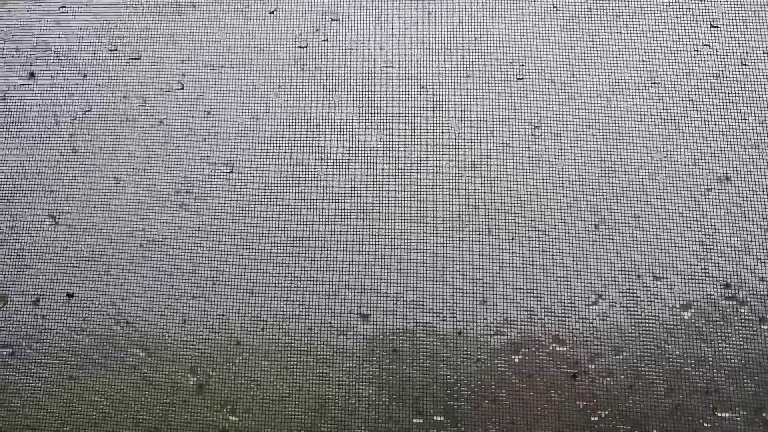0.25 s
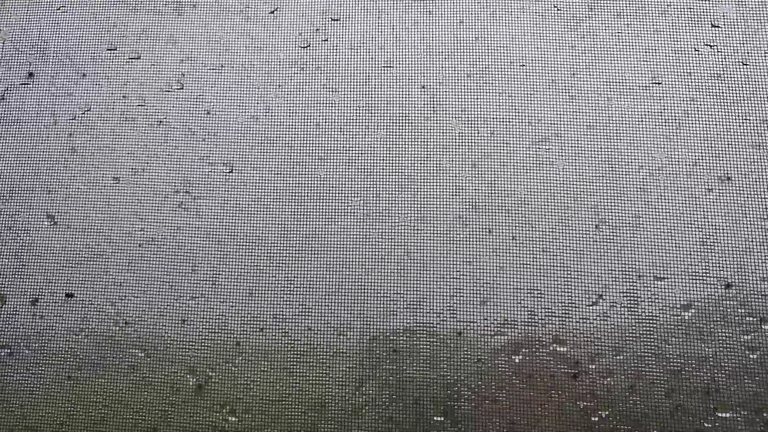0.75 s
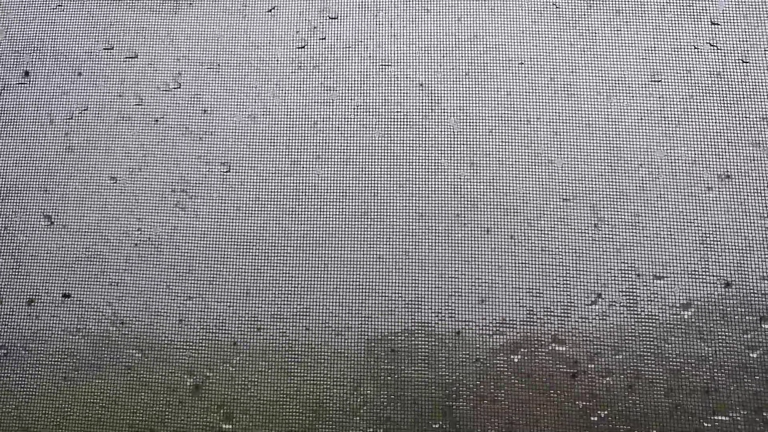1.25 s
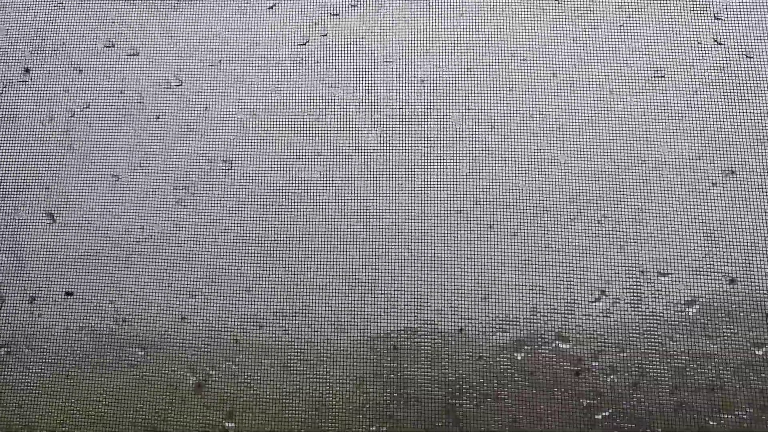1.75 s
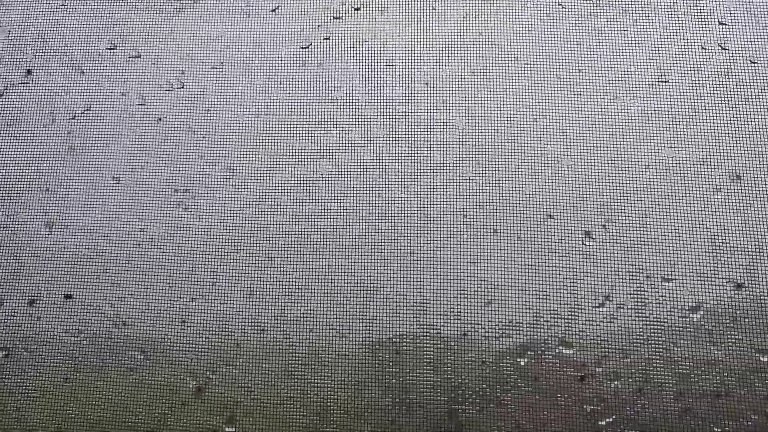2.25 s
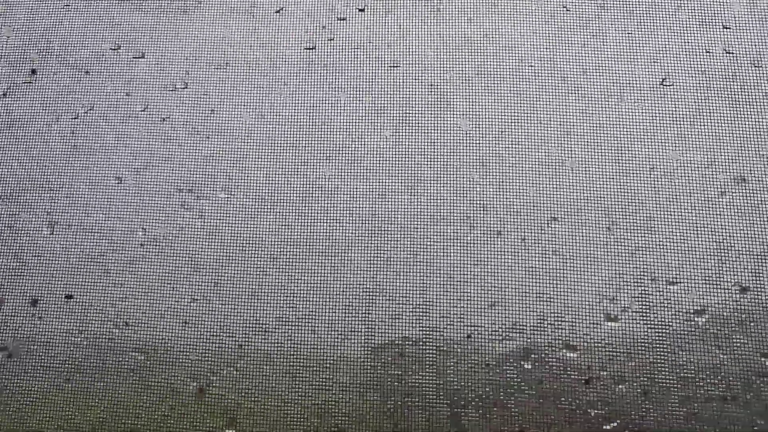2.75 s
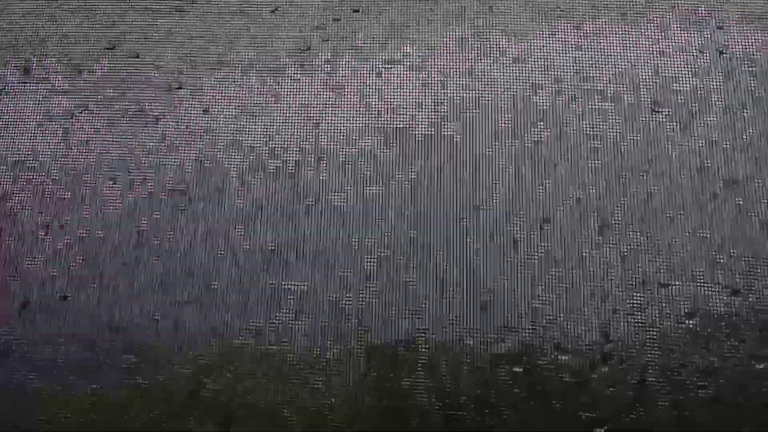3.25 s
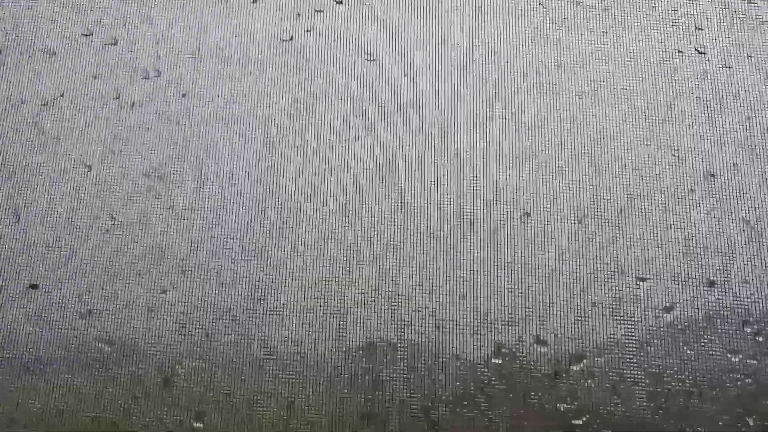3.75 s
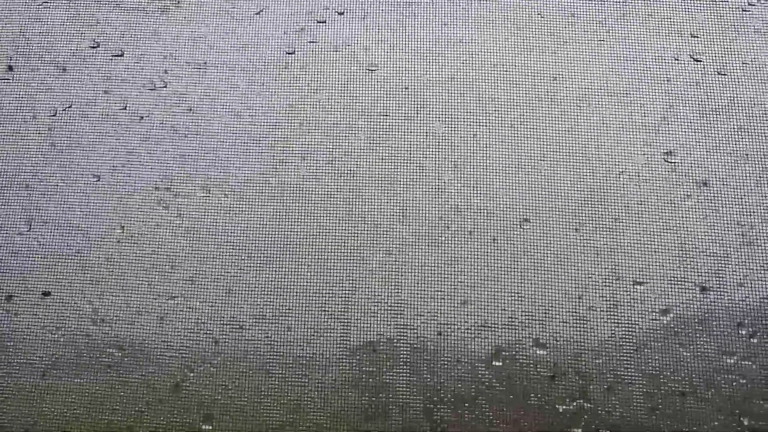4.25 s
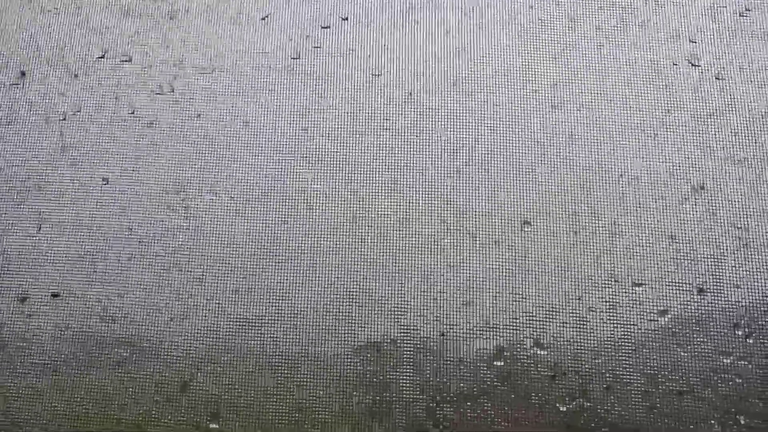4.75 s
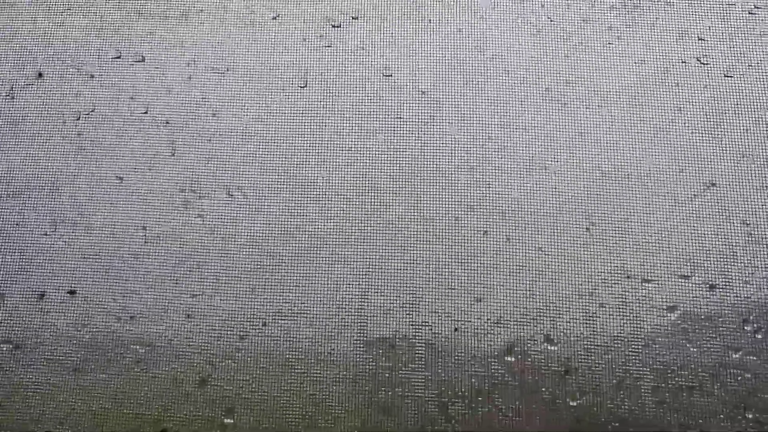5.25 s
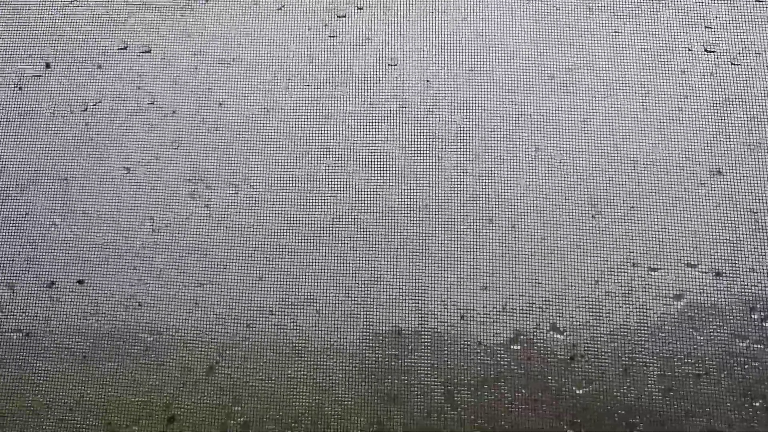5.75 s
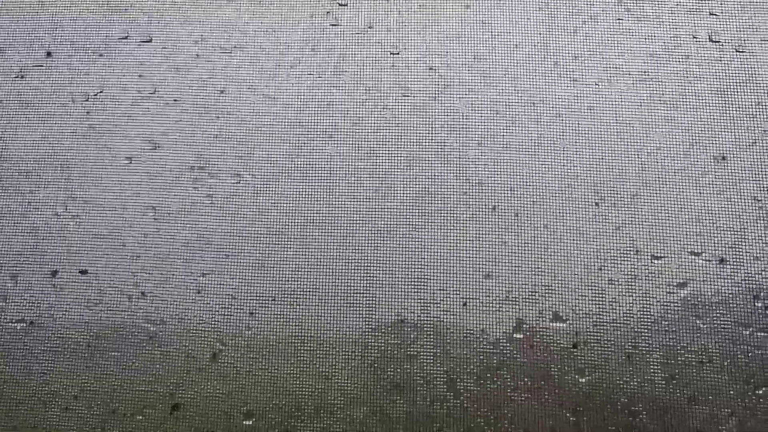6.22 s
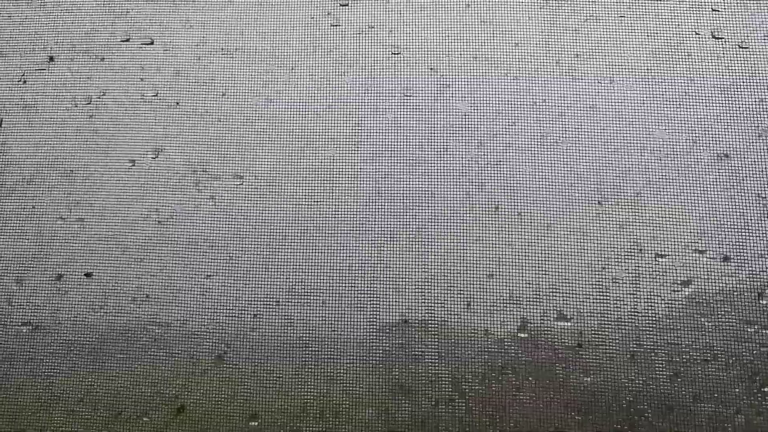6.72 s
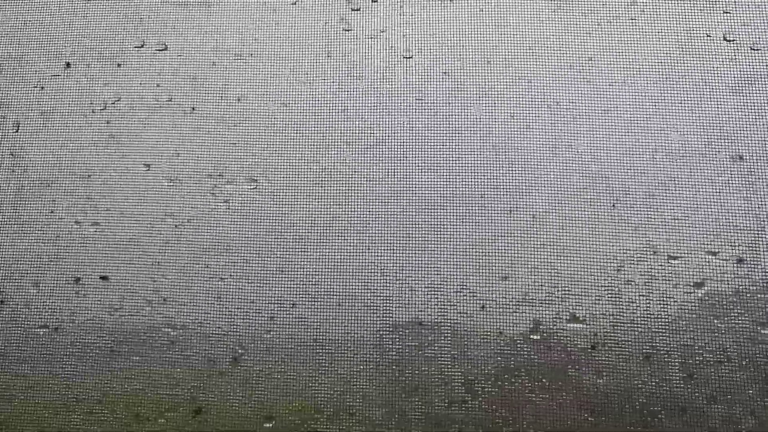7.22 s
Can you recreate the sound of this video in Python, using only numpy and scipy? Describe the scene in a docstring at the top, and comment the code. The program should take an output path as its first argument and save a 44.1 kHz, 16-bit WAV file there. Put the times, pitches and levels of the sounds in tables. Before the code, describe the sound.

Soft rain for two and a half seconds, then a tearing thunderclap, a sharper second crack, and deep peals rolling on to the end.

```python
"""Close thunder: shock waves from a crooked lightning channel arrive as claps and peals, near bends crackling,
far bends booming and thudding. Claps are shocks and noise bursts, peals swelling bands of noise. A hollow ring
and a thin rattle follow the second strike; short pitched rings and ticks sit among the claps. Behind it rain
patter (random impacts), louder around 3 s with the thunder's own hiss mixed in, single drops (rising sines) and
a faint narrow hiss high above 11 kHz. An open window with a wet screen colours claps, peals and rain."""
import sys
import numpy as np
from scipy import signal
from scipy.fft import rfft, irfft, next_fast_len
from scipy.io import wavfile
from scipy.ndimage import uniform_filter1d, minimum_filter1d, map_coordinates

SR = 44100
rng = np.random.default_rng(int(sys.argv[2]) if len(sys.argv) > 2 else 0)


def digitize_waveform(pressure):
    """Quantize a signal to 16-bit integers and store it at the path in sys.argv[1].

    Rows of a 2-D input are taken as channels; values are limited to [-1, 1].
    """
    field = np.atleast_2d(pressure).T
    bounded = np.clip(field, -1, 1)
    quanta = np.round(bounded * 32767).astype(np.int16)
    wavfile.write(sys.argv[1], SR, quanta)


N = 329779

# Single shock fronts. Each row: start in seconds, clap level in dB, sizzle in dB, low push in dB,
# crackle after it in dB, decay of the tearing burst by 60 dB in seconds.
CLAPS = [(2.589, -29.5, -53, -54, -40.5, 0.11), (2.708, -23, -46, -43, -32.5, 0.087),
         (2.722, -36, -39, -47, -27, 0.073), (2.734, -26.5, -43, -48, -32.5, 0.087),
         (2.767, -29, -45, -44, -42, 0.11), (2.813, -13.5, -53.5, -33, -34.5, 0.044),
         (2.898, -32, -42, -41, -38, 0.088), (2.916, -27, -45, -33, -39, 0.08),
         (2.952, -30, -39, -21, -36, 0.08), (2.974, -15.5, -38.5, -24, -34, 0.05),
         (2.988, -15.5, -39.5, -27, -39, .04), (3.032, -18, -41, -31, -38, 0.05),
         (3.068, -20, -56, -36, -40, 0.045), (3.109, -25, -61, -31.5, -35, 0.067),
         (3.143, -20, -47.5, -50, -48, 0.05), (3.246, -19, -46.5, -55, -39, 0.086),
         (3.262, -26, -54, -55, -34, 0.09), (3.519, -26, -55, -50, -40, 0.07),
         (3.806, -25, -52, -53, -38, 0.098), (3.83, -28, -64, -55, -41, 0.2),
         (4.186, -30, -51, -41, -36, 0.13), (4.335, -8, -36, -20, -36, 0.049),
         (4.347, -15, -37.5, -30, -33, 0.052), (4.384, -20.5, -56.5, -17, -34, 0.039),
         (4.478, -12.5, -40, -28, -44, 0.04), (4.488, -17.5, -45.5, -35, -37, .04),
         (4.545, -18, -43, -39, -37, 0.045), (4.555, -10, -37, -30, -35, 0.049),
         (4.577, -16, -51, -36, -38, 0.055), (4.643, -28, -53.5, -27, -31.5, 0.044),
         (4.739, -27, -52, -35, -45, 0.057), (4.788, -25.5, -51, -36, -37, 0.11),
         (4.857, -22, -53, -35, -36, 0.044), (4.877, -19, -53, -29, -45, 0.063),
         (4.901, -25.5, -56, -22, -51, 0.039), (4.96, -22, -46.5, -33, -33, 0.055),
         (5.074, -19, -52.5, -35, -40, 0.06), (5.092, -16.5, -54, -26, -40, 0.052),
         (5.275, -34, -61, -42, -43, 0.046), (5.363, -22.5, -55, -46, -36, 0.042),
         (5.397, -39, -62, -39, -54, 0.05), (5.434, -20.5, -61, -44, -46, 0.06),
         (5.595, -29, -59, -33, -41, 0.069), (6.076, -37, -65, -44, -41, 0.05),
         (6.312, -35, -68, -40, -39, .053), (6.562, -31.5, -54.5, -39, -45, 0.11),
         (6.603, -28, -71, -22.5, -38, 0.092), (7.073, -42, -71, -44, -48.5, .085),
         (7.101, -39, -64.5, -28, -44.5, 0.087), (7.23, -31, -66.5, -17, -44, 0.042)]
# Pitched rings in the claps. Each row: start in seconds, mean pitch in Hz, level in dB, hold in seconds,
# decay by 60 dB in seconds.
PINGS = [(2.728, 615, -31, 0.015, 0.053), (2.73, 1990, -36, 0.007, .05), (2.897, 869, -31, 0.02, .05),
         (2.967, 237.7, -14.5, 0.021, 0.091), (3.141, 640, -23, 0.0055, 0.03),
         (3.248, 1895, -34, .015, .06), (4.334, 405, -17, 0.0044, 0.028), (4.338, 1913, -25, 0.0062, 0.038),
         (4.339, 913, -19, 0.0094, .04), (4.382, 1250, -29, 0.0065, .04), (4.4786, 894, -19, 0.0061, 0.037),
         (4.486, 555, -20.5, .008, .04), (4.483, 1610, -31.5, 0.026, 0.062),
         (4.552, 885, -22.5, 0.01, 0.036), (4.556, 2120, -25, 0.0042, .04), (4.735, 613, -25, .008, 0.062),
         (4.79, 1160, -31.5, 0.015, 0.078), (4.96, 627, -24, .008, .06), (4.961, 1930, -41, .01, 0.044),
         (4.985, 1530, -35, 0.017, 0.069), (5.079, 644, -24, 0.0069, 0.066),
         (5.433, 623, -27.5, 0.0049, .05), (6.317, 726, -36, 0.016, .05), (7.225, 209, -9.5, 0.0087, 0.064)]
# Peals from bends of the channel. Each row: time of the peak in seconds, thud in dB, boom in dB,
# growl in dB, time of the last 20 dB of rise in seconds.
PEALS = [(2.616, -40.5, -48, -44, 0.045), (2.736, -37, -27.5, -31.5, 0.059), (2.815, -44, -29, -28, 0.055),
         (2.919, -48, -30.5, -30, 0.062), (2.978, -31.5, -24.5, -32, 0.051), (2.993, -34, -23, -34, 0.06),
         (3.021, -40, -20.5, -29.5, 0.15), (3.079, -33.5, -25.5, -30.5, 0.071), (3.17, -53, -31, -34, 0.08),
         (3.319, -51, -32, -34.5, 0.3), (3.443, -46, -51, -61, 0.15), (3.559, -59, -38.5, -53, 0.14),
         (3.609, -44, -53, -55, 0.071), (3.697, -60, -41.5, -41, 0.12), (3.83, -43, -44, -46, 0.074),
         (3.95, -47, -42, -42, 0.22), (4.037, -37.5, -48, -56, 0.18), (4.197, -50, -47, -40, 0.031),
         (4.34, -23, -23, -20, 0.0053), (4.36, -22, -18, -23.5, 0.015), (4.388, -31, -22, -22.5, .01),
         (4.433, -37, -38, -23, 0.03), (4.457, -25.5, -25.5, -43, 0.012),
         (4.484, -20.5, -21.5, -24.5, 0.012), (4.516, -18.5, -20, -38, 0.03),
         (4.563, -26.5, -21, -24, 0.069), (4.646, -26, -27, -45, 0.049), (4.72, -35, -33.5, -34.5, .08),
         (4.79, -30, -40, -28.5, 0.074), (4.896, -30, -21.5, -29, .06), (4.959, -21.5, -27, -35, .04),
         (4.992, -21, -24.5, -25, 0.071), (5.024, -37, -33, -30, .04), (5.079, -27.5, -27, -23.5, 0.026),
         (5.106, -35, -25.5, -41, .04), (5.144, -28, -38, -31.5, 0.079), (5.199, -31.5, -44, -27, 0.14),
         (5.32, -38, -32, -50, 0.19), (5.452, -37, -38, -31, 0.26), (5.61, -42, -47, -32, 0.15),
         (5.766, -47, -47, -34, 0.085), (5.84, -36.5, -53, -36.5, 0.067), (5.97, -40, -38, -57, 0.037),
         (6.06, -41, -40, -41, 0.056), (6.12, -38, -44, -38, .04), (6.25, -41, -47, -48, .06),
         (6.31, -39, -37, -38.5, 0.049), (6.346, -28.5, -37, -39, 0.06), (6.37, -46, -33, -49, 0.063),
         (6.434, -35, -40, -43, 0.033), (6.577, -18.5, -48, -33.5, 0.022),
         (6.615, -27, -22.5, -35.5, 0.042), (6.65, -36, -23, -41, 0.061), (6.69, -31, -26, -40.5, 0.05),
         (6.77, -31, -43, -55, 0.23), (6.894, -30.5, -46, -48, 0.11), (6.949, -29.5, -32, -42, 0.048),
         (7.03, -34, -32, -44.5, .05), (7.07, -32, -23, -33.5, 0.023), (7.12, -33.5, -18, -42, 0.044),
         (7.16, -41, -26.5, -40.5, 0.06), (7.2, -37, -24, -38, .06), (7.236, -29.5, -21, -34, 0.08),
         (7.284, -44, -21, -46, 0.049), (7.33, -32, -30, -37.5, .08), (7.416, -30.5, -36.5, -54, 0.095),
         (7.46, -30, -42.5, -37, 0.044)]
# Slowly swelling and fading roll under peals and claps, before random wavering. Each row: time in seconds,
# rumble in dB, crackle in dB, tearing hiss in dB.
ROLL = [(2.45, -68, -86, -73), (2.58, -72, -49, -53.5), (2.69, -57, -44, -55), (2.72, -41, -41, -50),
        (3.1, -35.5, -31.5, -48), (3.21, -38, -39, -45), (3.3, -38.5, -40, -50.5), (3.5, -45, -43.5, -62),
        (3.75, -48.5, -54, -60), (4.1, -44.5, -47.5, -66), (4.325, -41.5, -45.5, -55),
        (4.345, -49, -38, -55), (4.45, -44, -36.5, -61), (4.51, -42, -35, -45.5), (4.56, -35, -29.5, -50),
        (4.62, -37, -35, -56), (4.72, -36.5, -37, -53.5), (4.85, -34, -36, -57.5), (5.1, -41, -33, -52.5),
        (5.25, -40, -39.5, -69), (5.5, -38, -42.5, -66), (6.1, -44.5, -47.5, -68), (6.27, -44, -44.5, -71),
        (6.5, -47.5, -47, -62.5), (6.6, -41.5, -45.5, -62), (7.05, -39, -49.5, -67), (7.48, -43, -51, -76)]
# Crackle dulled by a long path. Each row: time in seconds, share of the power from 0 to 1.
FAR_SHARE = [(2.5, 0.2), (2.85, 0.18), (3.0, 0.63), (3.18, 0.6), (3.25, 0.16), (3.4, 0.35), (3.6, 0.16),
             (4.3, 0), (4.7, 0.2), (5.2, 0.58), (5.7, 0.25), (6.3, 0.73), (7.48, 0.74)]
# Ring and rattle after the second strike, before random wavering. Each row: time in seconds,
# ring in dB over the growl, rattle in dB over the crackle.
WAKE = [(4.33, -70, -70), (4.4, -22, -32), (4.56, -26, -9.5), (4.66, -11, -22), (4.73, -10, -11),
        (4.8, -11, -19), (4.88, -4.5, -9.5), (4.95, -0.5, -31), (5.04, -8, -16), (5.1, -10, -17),
        (5.25, -2, -30), (5.4, -0.5, -28), (5.6, -9, -29), (5.8, -3, -30), (5.92, -2, -28), (6.05, -6, -22),
        (6.2, -5, -25), (6.33, -9, -33), (6.7, -33, -46), (7.1, -60, -73)]
# Rain patter, louder around 3 s with the thunder's own hiss mixed in, and a thin high hiss, both before random
# wavering. Each row: time in seconds, patter in dB, high hiss in dB.
RAIN = [(0, -48.5, -78), (.55, -47, -75), (.8, -45, -73), (1.1, -45, -72.5), (1.5, -45, -69.5),
        (1.9, -47, -76), (2.4, -45.5, -71.5), (3.0, -41, -68), (3.5, -41.5, -69), (3.85, -42.5, -69),
        (4.2, -44.5, -72), (4.6, -46.5, -76.5), (5.5, -46, -72.5), (6, -50.5, -77), (6.4, -51, -78),
        (6.65, -49, -78.5), (7.1, -50.5, -76), (7.48, -50, -76.5)]
# Single drops near the window. Each row: start in seconds, level in dB, nominal pitch in Hz.
DRIPS = [(0.2914, -32.5, 2050), (0.2985, -35, 2300), (0.4438, -32.5, 2200), (1.3364, -43, 1610),
         (2.0188, -40, 1850), (2.1345, -39, 1910), (2.532, -37, 1860), (6.0127, -38, 1960),
         (6.997, -40, 2110)]
# Thin high ticks. Each row: start in seconds, level in dB.
TICKS = [(2.7255, -40), (4.5273, -42), (4.554, -46), (4.6394, -48.5), (4.807, -51), (4.9195, -57)]

# Spectrum of a clap's leading shock and tearing burst. Each row: frequency in Hz, density in dB per Hz.
CRACK_SPECTRUM = [(200, -19.5), (420, 1), (650, -1.5), (900, -1), (1300, -7), (1950, -6.5), (2400, 1.5),
                  (3500, -31), (8000, -47.5)]
# Spectrum of a clap's sizzling edge. Each row: frequency in Hz, density in dB per Hz.
SIZZLE_SPECTRUM = [(1500, -25.5), (2800, 1), (4500, -1), (6500, 3.5), (9000, -5.5), (12000, -9)]
# Spectrum of a clap's low push. Each row: frequency in Hz, density in dB per Hz.
PUSH_SPECTRUM = [(60, -1), (220, -0.5), (300, -5.0), (700, -12.5), (2000, -50.0)]
# Spectrum of the deepest part of a peal. Each row: frequency in Hz, density in dB per Hz.
THUD_SPECTRUM = [(20, 0.5), (70, -3.5), (95, -1), (140, -1.5), (200, -9.5), (400, -52)]
# Spectrum of the boom above the thud. Each row: frequency in Hz, density in dB per Hz.
BOOM_SPECTRUM = [(60, -31.5), (150, -5), (190, 3), (280, 3), (350, -26.5), (800, -52)]
# Spectrum of the growl above the boom. Each row: frequency in Hz, density in dB per Hz.
GROWL_SPECTRUM = [(120, -31), (270, -11.5), (320, 2), (520, -5), (700, -15), (1500, -42)]
# Spectrum of crackle from near bends. Each row: frequency in Hz, density in dB per Hz.
NEAR_CRACKLE_SPECTRUM = [(250, -35.5), (600, 1), (1000, -1.5), (2200, -6), (4500, -19), (9000, -25.5)]
# Spectrum of crackle from far bends. Each row: frequency in Hz, density in dB per Hz.
FAR_CRACKLE_SPECTRUM = [(250, -25), (600, 1), (1000, -3.5), (1500, -9), (2200, -21.5), (4500, -41)]
# Spectrum of the tearing hiss in the roll. Each row: frequency in Hz, density in dB per Hz.
HISS_SPECTRUM = [(1500, -15.5), (2600, -2.5), (4500, -5.5), (7000, -4), (10000, -14)]
# Spectrum of the hollow ring. Each row: frequency in Hz, density in dB per Hz.
RING_SPECTRUM = [(450, -35.5), (560, -8.5), (600, 3.5), (625, 3.5), (670, -12.5), (800, -32.5)]
# Spectrum of the thin rattle. Each row: frequency in Hz, density in dB per Hz.
RATTLE_SPECTRUM = [(1900, -32.5), (2250, -6.5), (2400, 12), (2700, -16), (3000, -30.5)]
# Spectrum of the rain patter. Each row: frequency in Hz, density in dB per Hz.
PATTER_SPECTRUM = [(20, -1), (300, 0.5), (1000, -4.5), (3000, -7), (8000, -4.5), (12000, 5.5)]
# Spectrum of nearer splashes. Each row: frequency in Hz, density in dB per Hz.
SPLASH_SPECTRUM = [(500, -25), (1500, -2.5), (2000, -6), (3000, 0.5), (4600, -3), (7000, -11),
                   (12000, -8.5)]
# Spectrum of the thin high hiss. Each row: frequency in Hz, density in dB per Hz.
HIGH_HISS_SPECTRUM = [(10800, -66), (11400, -38.5), (11600, 4), (12500, 3), (12900, -2), (13100, 7.5),
                      (13900, 0.5), (14200, -7)]
# Window recess and microphone. Each row: frequency in Hz, gain in dB.
COLOUR = [(20, -50), (60, -21), (88, -8), (200, -2.5), (250, 0.5), (400, -4.5), (2150, -4), (2300, -14.5),
          (4000, -18), (5200, -23), (7600, -31.5), (7800, -38), (8600, -46), (11300, -57.5)]
# Resonances of frame and screen. Each row: centre in Hz, width in Hz, gain in dB above the colour.
FRAME = [(231.6, 40, 3.5), (602, 47, 5.5), (877, 47, 5), (2147, 24, -1), (1878, 92, 3), (4336, 190, 9),
         (4680, 250, 12.5), (6510, 380, 3.5), (91.1, 15, 6.5), (152.4, 29, 7)]

CLAP_RISE_S = 0.0022  # time constant of the burst's onset
SHOCK_DB, TEAR_DB = 19.5, -11  # relative to the clap level
SIZZLE_LASTS, PUSH_LASTS = 1.31, 1.2  # times the decay of the tearing burst
FLARE_DB = -25  # the thin high hiss relative to a clap's sizzle
PING_RISE_CYCLES = 1.1  # time constant of a ring's onset, in cycles of its pitch
PING_WAVER = 0.044  # share of the pitch
THUD_T60_S, BOOM_T60_S, GROWL_T60_S = 0.33, 0.2, 0.22  # how long a peal lingers in each register
AFTER_T60_S = 0.23  # decay of the crackle after a clap
CEILING_DB, TOP_HZ = -8.5, 14050  # limiter ceiling re full scale; band limit


def claps():
    """Single fronts: a shock, a tearing burst, a sizzling edge and a low push that outlasts the burst."""
    lead, tear_level, edge_level, push_level = np.zeros((4, N + SR))
    t = np.arange(SR // 2) / SR
    front = 1 - np.exp(-t / CLAP_RISE_S)
    for s, db, sizzle_db, push_db, _, t60 in CLAPS:
        start = round(s * SR)
        here = slice(start, start + len(t))
        lead[start] = amp(db + SHOCK_DB)
        tear_level[here] += amp(db + TEAR_DB - 60 * t / t60) * front
        edge_level[here] += amp(sizzle_db - 60 * t / (SIZZLE_LASTS * t60)) * front
        push_level[here] += amp(push_db - 60 * t / (PUSH_LASTS * t60)) * front
    shock = coloured(lead[:N], lambda hz: along(CRACK_SPECTRUM, hz) + window(hz))
    tear = dense(heard(impacts(1500, spread_db=1.5, share=0.57), CRACK_SPECTRUM), 0.6)
    sizzle = heard(impacts(1800, spread_db=-3.0, share=0.21), SIZZLE_SPECTRUM)
    push = dense(heard(rng.standard_normal(N), PUSH_SPECTRUM), 0.57)
    return shock + tear_level[:N] * tear + edge_level[:N] * sizzle + push_level[:N] * push


def pings():
    """Some fronts leave one wavering pitch ringing for a moment."""
    out, t = np.zeros(N + SR), np.arange(SR // 5) / SR
    bend = 1 + PING_WAVER * wobble(90)
    for s, hz, db, hold, t60 in PINGS:
        start = round(s * SR)
        onset = 1 - np.exp(-t * hz / PING_RISE_CYCLES)
        decay = amp(db - 60 * np.maximum(t - hold, 0) / t60)
        cycles = hz * np.cumsum(bend[start:][:len(t)]) / SR
        out[start:][:len(t)] += decay * onset * np.sin(2 * np.pi * cycles)
    return out[:N]


def peals(thud_level, boom_level, growl_level, crackle_level):
    """Overlapping shocks from many bends of the channel; the longer the path, the duller and more blurred."""
    hiss_db = curves(ROLL, outside=-120)[2]
    lumps = wobble(22)  # shared by growl, crackle and hiss
    thud = dense(heard(rng.standard_normal(N), THUD_SPECTRUM), 0.57)
    boom = dense(heard(rng.standard_normal(N), BOOM_SPECTRUM), 0.95)
    growl = dense(heard(impacts(200, spread_db=3, share=0.28), GROWL_SPECTRUM), 0.12)
    growl *= amp(0.7 * lumps)
    crackle = crackling() * amp(1.0 * lumps + 1.0 * wobble(45))
    hiss = heard(impacts(1300, spread_db=0.0, share=0.64), HISS_SPECTRUM)
    hiss *= amp(hiss_db + 0.72 * lumps + 0.84 * wobble(7.5))
    return thud_level * thud + boom_level * boom + growl_level * growl + crackle_level * crackle + hiss


def crackling():
    """Dense small shocks, bright from near bends and dull from far ones."""
    far = np.clip(curves(FAR_SHARE)[0], 0, 1)
    near = heard(impacts(400, spread_db=3.0, share=0.22), NEAR_CRACKLE_SPECTRUM)
    dull = heard(impacts(250, spread_db=4.5, share=0.34), FAR_CRACKLE_SPECTRUM)
    return np.sqrt(1 - far) * patchy(near, depth_db=1.5) + np.sqrt(far) * patchy(dull, depth_db=1.5)


def swells():
    """Levels of thud, boom, growl and crackle: peals and the aftermath of claps over the slower roll."""
    rumble_db, crackle_db, _ = curves(ROLL, outside=-120)
    s, thud_db, boom_db, growl_db, rise = np.transpose(PEALS)
    clap_s, *_, after_db, _ = np.transpose(CLAPS)
    thud_roll = amp(rumble_db - 2.5 + 2.8 * wobble(14))
    boom_roll = amp(rumble_db + 1.8 * wobble(19))
    growl_roll = amp(rumble_db - 2.26 + 2.6 * wobble(15))
    crackle_roll = amp(crackle_db + 0.95 * wobble(15))
    # roll and bursts add as powers
    return (np.hypot(thud_roll, bursts(s, thud_db, rise, THUD_T60_S)),
            np.hypot(boom_roll, bursts(s, boom_db, rise, BOOM_T60_S)),
            np.hypot(growl_roll, bursts(s, growl_db, rise, GROWL_T60_S)),
            np.hypot(crackle_roll, bursts(clap_s + 0.012, after_db, 0.0097, AFTER_T60_S)))


def wake(growl_level, crackle_level):
    """The growl keeps one hollow resonance going, the crackle sets something light rattling."""
    ring_db, rattle_db = curves(WAKE, outside=-120)
    ring = dense(heard(rng.standard_normal(N), RING_SPECTRUM), 0.75) * amp(1.2 * wobble(25))
    rattle = heard(impacts(400, spread_db=5, share=0.24), RATTLE_SPECTRUM)
    lingering = np.sqrt(np.abs(uniform_filter1d(growl_level ** 2, size=8000)))
    rattle_gain = amp(rattle_db + 2.0 * wobble(35))
    return amp(ring_db) * lingering * ring + rattle_gain * crackle_level * rattle


def rain():
    """Drops on ground and leaves patter, swelling a little in gusts; nearer ones splash apart."""
    patter_db, _ = curves(RAIN)
    gust = wobble(4.1)
    patter = heard(impacts(1500, spread_db=4.5, share=0.29), PATTER_SPECTRUM)
    patter = patchy(patter, depth_db=0.92)
    splashes = heard(impacts(60, spread_db=0, share=0.85), SPLASH_SPECTRUM)
    rain_level = amp(patter_db + 0.25 * gust + 0.42 * wobble(10))
    return rain_level * (patter + amp(-22.5) * splashes)


def drips():
    """Each near drop is a short plink whose pitch rises, with a faint steady tone beside it."""
    out, t = np.zeros(N + SR), np.arange(SR // 20) / SR
    shape = amp(-60 * t / 0.024) * (1 - np.exp(-t / 0.0008))
    for s, db, hz in DRIPS:
        rising = np.sin(2 * np.pi * hz * t * (0.85 + 12 * t))
        steady = 0.099 * np.sin(2 * np.pi * 1.05 * hz * t)
        out[round(s * SR):][:len(t)] += amp(db) * shape * (rising + steady)
    return out[:N]


def ticks():
    """Tiny high snaps: a 6400 Hz tone that swells and dies within a few milliseconds."""
    out, t = np.zeros(N + SR), np.arange(SR // 20) / SR
    snap = amp(-60 * t / 0.003) * (t / 0.0003) ** 2 * np.sin(2 * np.pi * 6400 * t)
    for s, db in TICKS:
        out[round(s * SR):][:len(t)] += amp(db) * snap
    return out[:N]


def high_hiss():
    """Faint narrow hiss near 12-14 kHz, rising with rain and claps."""
    _, hiss_db = curves(RAIN)
    clap_s, _, sizzle_db, *_ = np.transpose(CLAPS)
    grains = impacts(1800, spread_db=10.5, share=0.25)
    hiss = unit(coloured(grains, lambda hz: along(HIGH_HISS_SPECTRUM, hz)))
    floor = amp(hiss_db + 1.4 * wobble(7) + 0.7 * wobble(12))
    flares = bursts(clap_s + 0.01, sizzle_db + FLARE_DB, 0.015, t60=0.2)
    return np.hypot(floor, flares) * hiss


def impacts(rate, spread_db, share):
    """Random impulses of uneven size, rate a second, with their share of power over a blur of faint ones."""
    hit = rng.random(N) < rate / SR
    size = amp(spread_db * np.minimum(rng.exponential(size=N), 4))
    sign = np.sign(rng.standard_normal(N))
    return np.sqrt(share) * unit(hit * size * sign) + np.sqrt(1 - share) * rng.standard_normal(N)


def bursts(times, db, rise, t60):
    """Level of overlapping bursts: each climbs 20 dB in its rise time, then dies; their powers add."""
    power, t = np.zeros(N + 2 * SR), np.arange(-SR // 2, SR) / SR
    for s, top_db, up in np.broadcast(times, db, rise):
        shape_db = np.where(t < 0, 20 * t / up, -60 * t / t60)
        power[round(s * SR):][:len(t)] += amp(top_db + shape_db) ** 2
    return np.sqrt(power[SR // 2:][:N])  # drops the half second of lead-in


def dense(x, amount):
    """Evens out the chance beats of a low noise, as when many echoes overlap."""
    level = np.sqrt(np.abs(uniform_filter1d(x ** 2, size=900))) + 0.17
    return unit(x / level ** amount)


def patchy(x, depth_db):
    """Short patches of random colour: some bands swell while their neighbours sink."""
    z = signal.stft(x, nperseg=512)[2]
    across_bands = uniform_filter1d(rng.standard_normal(z.shape), size=4, axis=0)
    field = uniform_filter1d(across_bands, size=5, axis=1)
    return unit(signal.istft(z * amp(depth_db * unit(field)), nperseg=512)[1][:N])


def heard(x, spectrum):
    """A source of the given spectrum behind the window, rms 1."""
    return unit(coloured(x, lambda hz: along(spectrum, hz) + window(hz)))


def window(hz):
    """Gain in dB of recess, frame and microphone."""
    bumps = sum(db / (1 + (2 * (hz - centre) / width) ** 2) for centre, width, db in FRAME)
    return along(COLOUR, hz) + bumps


def coloured(x, db_at):
    """Passes x through a causal (minimum phase) filter with the given dB response."""
    m = 2 * next_fast_len(N // 2 + 8192)
    log_gain = np.maximum(db_at(np.fft.rfftfreq(m, 1 / SR)), -120) * np.log(10) / 20
    cepstrum = irfft(log_gain, m)
    # folding the cepstrum forward in time makes the phase minimum
    cepstrum[1:m // 2] *= 2
    cepstrum[m // 2 + 1:] = 0
    return irfft(rfft(x, m) * np.exp(rfft(cepstrum)), m)[:N]


def amp(db):
    """Decibels to gain."""
    return 10 ** (np.asarray(db) / 20)


def unit(x):
    """Scales to rms 1."""
    return x / np.sqrt(np.mean(x ** 2) + 1e-20)


def along(points, hz):
    """Reads (Hz, value) points on a log frequency axis."""
    f, v = np.transpose(points)
    return np.interp(np.log(hz + 1), np.log(f + 1), v)


def curves(rows, outside=None):
    """One value per sample for each column after the time."""
    s, *cols = np.transpose(rows)
    return [np.interp(np.arange(N) / SR, s, c, left=outside, right=outside) for c in cols]


def wobble(rate):
    """A smooth random curve, rate knots a second."""
    knots = rng.standard_normal(int(N * rate / SR) + 4)
    return map_coordinates(knots, [np.arange(N) * rate / SR])


def scene():
    """Thunder over rain, drops and a thin high hiss."""
    thud, boom, growl, crackle = swells()
    thunder = claps() + pings() + peals(thud, boom, growl, crackle) + wake(growl, crackle)
    return (thunder + rain() + drips() + ticks() + high_hiss())[None]


def record(dry):
    """A fast limiter holds the loudest fronts; nothing is kept above the band limit."""
    need = np.minimum(1, amp(CEILING_DB) / (np.abs(dry) + 1e-9))
    lowest = minimum_filter1d(need, size=400, axis=1)
    held = dry * uniform_filter1d(lowest, size=200, axis=1)
    m = next_fast_len(N + 8192)
    in_band = np.fft.rfftfreq(m, 1 / SR) < TOP_HZ
    return irfft(rfft(held, m) * in_band, m)[:, :N]


dry = scene()
out = record(dry)
digitize_waveform(out)
```